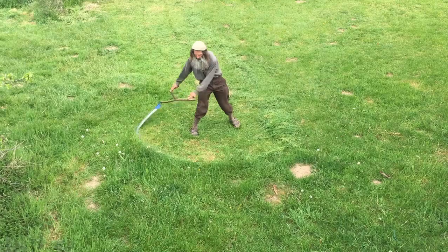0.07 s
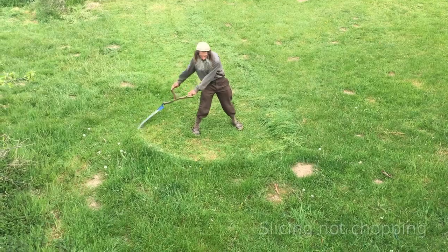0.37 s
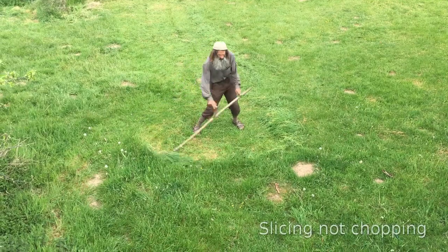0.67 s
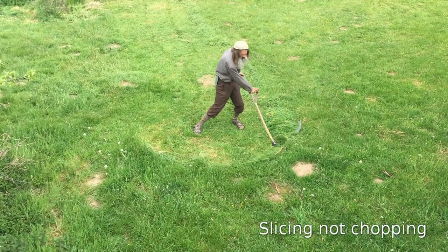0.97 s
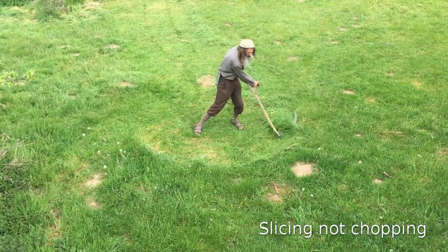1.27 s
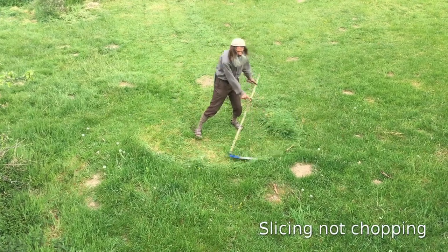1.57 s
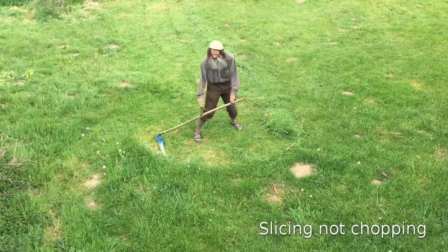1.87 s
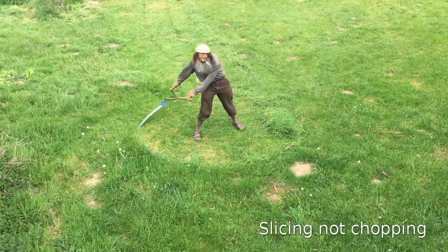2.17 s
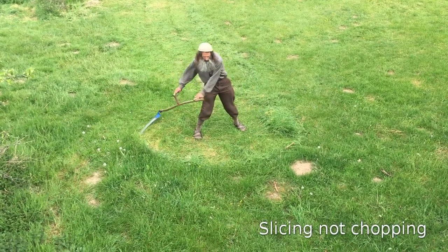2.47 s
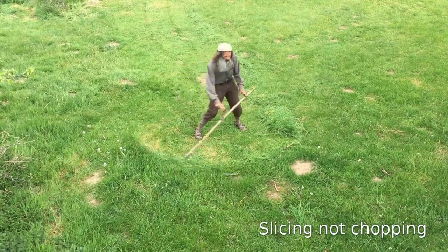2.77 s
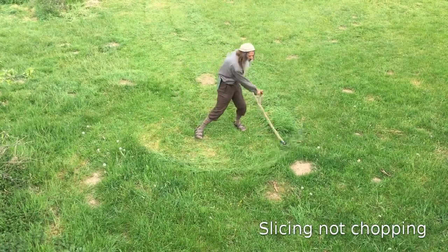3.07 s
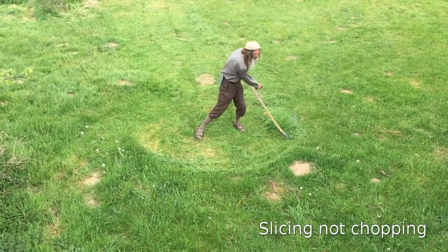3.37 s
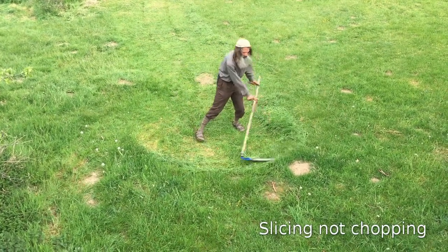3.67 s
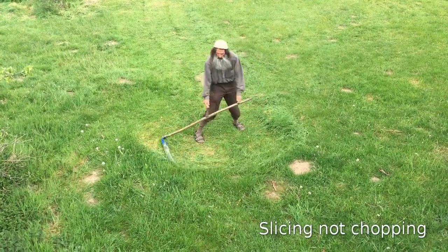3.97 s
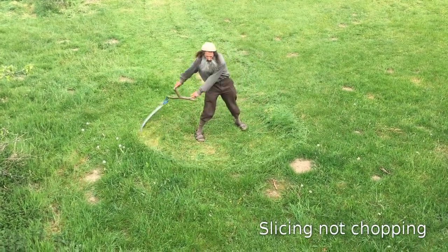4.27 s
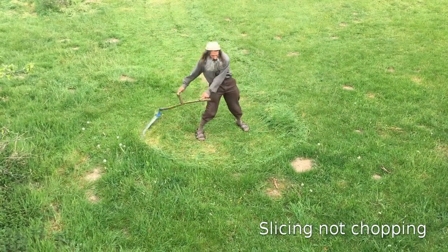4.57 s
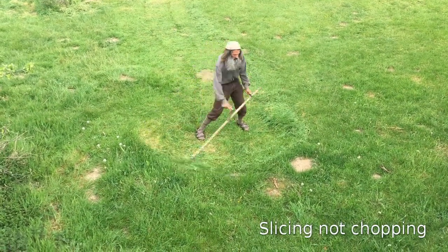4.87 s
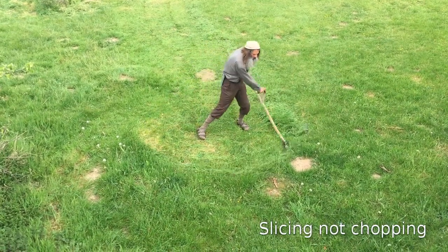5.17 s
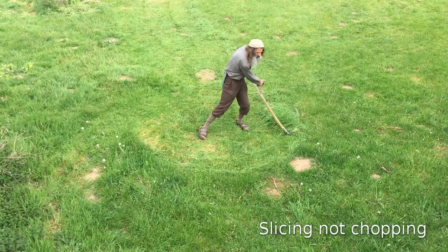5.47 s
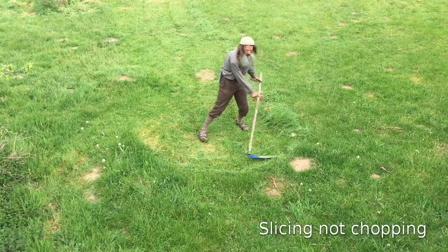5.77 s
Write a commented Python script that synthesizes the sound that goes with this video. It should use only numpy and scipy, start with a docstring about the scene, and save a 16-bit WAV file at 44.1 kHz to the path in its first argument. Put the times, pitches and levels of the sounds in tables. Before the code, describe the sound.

Outdoors on a lawn, gusts flutter and pop against the microphone while a scythe mows in a steady rhythm. Three bright, crunchy swishes cut the grass, each with a small crack of a tough tuft, and the blade scrapes lightly back over the stubble between them. Distant birds add thin whistles after the first stroke and a few rapid chirps during the last. The sound comes only from the left channel.

```python
"""A scythe drags back over the stubble of a lawn while a breeze buffets the microphone.
Three strokes follow, at 0.6, 2.7 and 4.8 s. In each, thousands of snapping stalks hiss and set the
steel ringing; the blade brushes the swath aside, then drags back. Its hiss falls in pitch as it lifts
and rises as it sinks again. From 1.3 s songbirds whistle far off, with a run of chirps at 5.2 s.
Only the left channel carries sound."""
import sys
import numpy as np
from scipy import signal
from scipy.fft import rfft, irfft, next_fast_len
from scipy.io import wavfile
from scipy.ndimage import uniform_filter1d, map_coordinates

SR = 44100
rng = np.random.default_rng(int(sys.argv[2]) if len(sys.argv) > 2 else 0)


def waveform_to_disk(signal):
    """Save audio, clipped to [-1, 1], as 16-bit WAV at the path in sys.argv[1]."""
    frames = np.transpose(np.atleast_2d(signal))
    scaled = np.clip(frames, -1, 1) * 32767
    samples = np.round(scaled).astype(np.int16)
    wavfile.write(sys.argv[1], SR, samples)


N = 260631
T = np.arange(N) / SR


def undb(db):
    """Amplitude ratio of a level in decibels."""
    return 10 ** (np.asarray(db) / 20)


def unit(x):
    """Normalisation to rms 1."""
    return x / np.sqrt(np.mean(x ** 2))


def bell(t, spread):
    """Bell-shaped envelope with its peak of 1 at t = 0."""
    return np.exp(-.5 * (t / spread) ** 2)


def curves(table):
    """Linear interpolation of a table's columns over the times in its first."""
    times, *columns = np.transpose(table)
    return [np.interp(T, times, column) for column in columns]


def colour(x, spectrum, modes=()):
    """Source-filter model: shape x by a (frequency [Hz], level [dB]) spectrum and resonances; rms 1."""
    size = next_fast_len(N)
    f = np.arange(size // 2 + 1) * SR / size
    hz, db = np.transpose(spectrum)
    gain = undb(np.interp(np.log(f + 1), np.log(hz), db, left=-90, right=-90))
    ring = 1 + sum(undb(peak_db) / (1 + 2j * (f - centre) / width) for centre, width, peak_db in modes)
    return unit(irfft(rfft(x, size) * gain * ring, size)[:N])


def wander(rate_hz):
    """Low-pass random modulation: smoothed random steps, rms 1."""
    size = int(SR / rate_hz)
    held = np.repeat(rng.standard_normal(N // size + 1), size)[:N]
    return unit(uniform_filter1d(uniform_filter1d(held, size), size))


def steady(x, seconds):
    """Division by the running rms evens out slow swells and keeps fast ones."""
    size = int(seconds * SR)
    power = uniform_filter1d(uniform_filter1d(x ** 2, size), size)
    return x / np.sqrt(power + 1e-9)


def snaps(per_s, spread_db, rub):
    """Shot noise: stalks snap at random, a few much louder than the rest, over smooth friction noise."""
    clicks = (rng.random(N) < per_s / SR) * rng.standard_normal(N)
    strength = undb(spread_db * np.minimum(rng.exponential(size=N), 4))
    return unit(unit(clicks * strength) + rub * rng.standard_normal(N))


def drag(t, length, late, lift_db_per_s, drag_db=-66.7, swell_db_per_s=9, contact_db_per_s=110):
    """Friction envelope of the return: the blade settles on the stubble, gathers speed and lifts clear."""
    settle_s, lift_at_s, airborne_at_s = .1, 1.45, 1.74
    settling = np.minimum(t - length - settle_s, 0)
    leaving = np.minimum(airborne_at_s + late - t, 0)
    since_lift = t - late - lift_at_s
    motion_db = np.minimum(swell_db_per_s * since_lift, -lift_db_per_s * since_lift)
    return undb(drag_db + contact_db_per_s * (settling + leaving) + motion_db)


def cut(t, length, cut_db=-55.5, rest_drop_db=25, land_s=.145, hold_s=.16):
    """Attack, hold and release, t seconds after entry: the blade lands, keeps its speed, then slows."""
    landing = np.maximum(-t, 0) / land_s
    slowing = np.maximum(t - hold_s, 0) / (length - hold_s)
    return undb(cut_db - rest_drop_db * (landing ** 1.3 + slowing ** 2.5))


# Spectra of the stalks: high swish, low bite, stubble rasp (frequency [Hz], level [dB])
SWISH_SPECTRUM = [(3820, -42), (6500, -8), (9170, 2), (10700, -2.5), (12500, 2), (14700, -1.5), (15600, -2)]
BITE_SPECTRUM = [(400, -19), (750, -4.5), (1050, 0), (1450, 1.5), (1750, 3.5), (2050, -0.5), (2280, -0.5),
                 (2520, -14), (4400, -9), (5400, -15), (6300, -13), (7000, -38), (9000, -43)]
RASP_SPECTRUM = [(2000, -29), (2600, -5), (2950, -5), (3250, 1), (3900, 0), (4400, -2), (4950, -8),
                 (5700, -3), (6400, -11), (7200, -12), (9000, -31)]
# Modes of the steel blade (frequency [Hz], bandwidth [Hz], level relative to the plain noise [dB])
BLADE_MODES = [(1051, 16, 0), (1411, 22, 0), (1603, 30, -4), (2259, 25, -1), (3310, 60, -7), (3744, 40, -7),
               (4683, 40, -6), (5356, 30, -4), (5729, 90, -5), (6293, 30, -3), (6621, 35, -2),
               (9784, 50, -6)]
# Strokes; of the first, only the end of the return is heard
# (entry time [s], cut length [s], lateness of return [s], level [dB], rasp [dB], swath level [dB])
STROKES = [(-1.47, .7, .02, -1, 1, -75), (.6, .72, 0, .3, -1.5, -80), (2.685, .705, .03, -.7, -.5, -63.5),
           (4.78, .745, 0, -.4, .8, -72)]


def scythe(swish_db=.1, bite_db=-7, rasp_db=-5.7, drag_bite_db=-3.5, drag_rasp_db=-5):
    """Forced vibration: snapping stalks hiss and drive the blade's modes; patchy grass varies the level."""
    swish = crunch = rasp = 0
    for entry, length, late, db, stubble_db, swath_db in STROKES:
        t = T - entry
        forward = undb(db) * cut(t, length)
        swath = undb(swath_db) * bell(t - .625, spread=.033)  # slides off near the end of the cut
        bite = undb(bite_db + 5 * bell(t - .16, spread=.11))  # hardest early in the cut
        swish += undb(swish_db) * (forward + swath + drag(t, length, late, lift_db_per_s=48))
        crunch += bite * forward + undb(drag_bite_db) * drag(t, length, late, lift_db_per_s=28)
        scrape = undb(drag_rasp_db) * drag(t, length, late, lift_db_per_s=22)
        rasp += undb(stubble_db) * (undb(rasp_db) * forward + scrape)
    stalks = snaps(per_s=8000, spread_db=1.6, rub=1.0)
    stalks *= undb(.9 * wander(70) + .7 * wander(18))  # small patches and larger clumps
    return (swish * colour(stalks, SWISH_SPECTRUM, BLADE_MODES)
            + crunch * colour(stalks, BITE_SPECTRUM, BLADE_MODES)
            + rasp * colour(stalks, RASP_SPECTRUM, BLADE_MODES))


# Resonances of the gap between blade and turf, alike in every stroke
# (time after entry [s], spread [s], centre frequency [Hz], glide [octaves/s], level [dB])
GAP_RESONANCES = [(-.08, .025, 5900, 5, -70), (.015, .025, 9600, 7.5, -58), (.085, .033, 5700, -1.9, -59.5),
                  (.09, .06, 1850, -2.6, -61), (.28, .08, 1300, -1.6, -67), (.28, .06, 3850, .5, -61.5),
                  (1.44, .09, 1830, 0, -69.3), (1.43, .045, 4750, 0, -68), (1.53, .065, 7400, -4.4, -72.3)]


def turf_gap(relative_width=.16, band_hz=2000):
    """Cavity resonance: hollow bands of hiss fall as the blade lifts off the turf and rise as it nears."""
    edges = band_hz * np.exp(np.array([-.5, .5]) * relative_width)
    bandpass = signal.butter(2, edges, "band", fs=SR, output="sos")
    band = unit(signal.sosfilt(bandpass, rng.standard_normal(N)))
    out = np.zeros(N)
    for entry, length, late, *_ in STROKES:
        offsets = rng.random(len(GAP_RESONANCES)) * N / 2
        for (delay, spread, hz, glide, db), offset in zip(GAP_RESONANCES, offsets):
            centre = entry + delay + (late if delay > length else 0)
            near = np.abs(T - centre) < 3 * spread
            t = T[near] - centre
            # reading the noise band faster or slower moves it to the gliding pitch
            position = offset + np.cumsum(hz * 2 ** (glide * t)) / band_hz
            hiss = map_coordinates(band, [position], order=1, mode="mirror")
            out[near] += undb(db) * bell(t, spread) * hiss
    return out


# Spectra of the wind's slow rolls and quick swirls (frequency [Hz], level [dB])
RUMBLE_SPECTRUM = [(20, -33), (32, -17.5), (45, -8), (65, 2.5), (85, -2.5), (125, -6), (170, -12),
                   (250, -31), (400, -65)]
FLUTTER_SPECTRUM = [(90, -33), (140, -1.5), (190, 4), (280, -8), (400, -10), (520, -22), (700, -36.5),
                    (1000, -44), (1600, -84)]
# Strength of the breeze (time [s], rumble level [dB], flutter level [dB])
GUSTS = [(.06, -46, -53), (.2, -50, -66), (.3, -45, -59), (.7, -40, -51), (1.2, -42.5, -52),
         (1.48, -37, -43), (1.7, -40, -47), (1.85, -48, -61), (2.1, -54, -71), (2.22, -41, -53),
         (2.56, -36.5, -44), (2.74, -41, -57), (2.92, -39, -49), (3.06, -38, -53), (3.24, -43, -55),
         (3.46, -38.5, -43), (3.75, -37, -48), (4.08, -33, -46), (4.24, -44, -53), (4.36, -35, -47),
         (4.54, -34, -41), (4.74, -41, -47), (4.84, -60, -70), (4.96, -40, -60), (5.1, -53, -70),
         (5.36, -42, -62), (5.57, -64, -72), (5.72, -44, -61), (5.91, -47, -63)]


def breeze(rumble_trim_db=1, flutter_trim_db=.5, flicker_db=3.5, puff_db=4.5, usual_flutter_db=-51.5):
    """Turbulence at the microphone: slow rolls, and a fitful flutter that rises in pitch with the gust."""
    rumble_db, flutter_db = curves(GUSTS)
    fits_db, puffs_db = flicker_db * wander(90), puff_db * wander(28)
    rolls = colour(rng.standard_normal(N), RUMBLE_SPECTRUM)
    rolls = steady(rolls * undb(fits_db / 2), seconds=.085)
    # advection: faster air carries the same swirls past sooner
    speed = undb(.15 * np.clip(flutter_db + fits_db - usual_flutter_db, -22, 5))
    swirls = colour(rng.standard_normal(N), FLUTTER_SPECTRUM)
    swirls = map_coordinates(swirls, [np.cumsum(speed)], order=3, mode="mirror")
    swirls = steady(swirls * undb(fits_db), seconds=.094)
    wind = undb(rumble_db + rumble_trim_db) * rolls + undb(flutter_db + flutter_trim_db) * swirls
    return steady(undb(puffs_db), seconds=.12) * wind


# Spectrum of the distant outdoor hush (frequency [Hz], level [dB])
HUSH_SPECTRUM = [(40, 21), (200, 2.5), (600, -0.5), (1200, -4), (2200, -7), (4000, -15), (8000, -17),
                 (15000, -23)]


def hush(hush_db=-66.7, rustle_per_db=.45, usual_rumble_db=-41):
    """Ambient noise: the broadband hush of the lawn swells with the stronger gusts."""
    rumble_db, _ = curves(GUSTS)
    rustle_db = rustle_per_db * np.maximum(rumble_db - usual_rumble_db, 0)
    return undb(hush_db + rustle_db + wander(5.7)) * colour(rng.standard_normal(N), HUSH_SPECTRUM)


# The strongest eddies that thump the microphone (time [s], level [dB], frequency [Hz], crest level [dB])
EDDIES = [(.298, -36, 150, -70), (.379, -35, 167, -66), (.608, -32, 250, -42), (.676, -32.5, 200, -59),
          (.887, -34, 258, -41.5), (1.172, -33, 245, -50), (1.25, -40, 275, -40), (1.308, -30.5, 160, -67),
          (1.37, -24.5, 293, -37.5), (1.484, -38, 173, -45), (1.501, -28, 190, -43),
          (2.194, -36.5, 221, -50), (2.22, -34, 168, -57), (2.357, -31, 224, -44.5),
          (2.483, -34.5, 220, -46), (2.498, -30, 227, -65), (2.554, -23, 234, -34.5),
          (2.804, -30, 158, -68), (2.86, -29, 243, -55), (2.868, -27, 181, -63), (3.017, -27.5, 175, -58),
          (3.06, -25.5, 182, -70), (3.278, -32, 154, -70), (3.392, -30.5, 185, -70), (3.408, -39, 276, -50),
          (3.434, -25, 360, -24), (3.44, -33, 260, -33), (3.516, -40, 298, -42), (3.579, -34.5, 240, -37),
          (3.675, -28, 202, -61), (3.692, -26, 330, -29), (3.841, -28.5, 160, -60), (3.866, -38, 260, -44),
          (3.946, -29, 258, -37.5), (4.087, -29, 167, -47), (4.369, -34, 187, -46), (4.458, -36, 288, -36),
          (4.478, -27.5, 129, -64), (4.51, -31, 230, -41), (4.52, -23, 169, -52), (4.733, -35.5, 218, -43),
          (5.337, -37, 247, -65)]


def eddies(swing_trim_db=1.5, crest_trim_db=1, spread_cycles=.61, crest_hz=500, crest_s=.00078):
    """Pressure transients: each eddy gives a few uneven swings, and a steep central crest makes it pop."""
    out = np.zeros(N)
    wobble = np.exp(.15 * wander(300))
    phases = rng.random((len(EDDIES), 2))
    for (time, db, hz, crest_db), (swing_phase, crest_phase) in zip(EDDIES, phases):
        near = np.abs(T - time) < .04
        t = T[near] - time
        cycles = np.cumsum(hz * wobble[near]) / SR
        swing = bell(t, spread_cycles / hz) * np.sin(2 * np.pi * (swing_phase + cycles - cycles.mean()))
        crest = np.sin(2 * np.pi * (crest_phase + crest_hz * t)) / np.cosh(t / crest_s)
        out[near] += undb(db + swing_trim_db) * swing + undb(crest_db + crest_trim_db) * crest
    return out


# Spectra of a tuft's crack and of the ringing edge (frequency [Hz], level [dB])
CRACK_SPECTRUM = [(900, 3.5), (2600, -1), (3400, 3.5), (6500, 0), (7800, -1), (9800, 6.5),
                  (11500, -15), (14500, 9), (16000, 0)]
EDGE_SPECTRUM = [(5200, -27), (5680, 4), (6050, -9), (6300, -2), (6650, -6), (7000, -23)]
# Tough tufts met by the edge (time [s], level [dB], spread [s], relative crunch [dB], relative ring [dB])
TUFTS = [(0.747, -60.5, .003, 15, -15), (0.756, -42.5, 0.0029, -15, -23), (0.776, -58, 0.0094, 3.5, -6),
         (2.85, -41.5, 0.0041, -21, 0.5), (2.862, -55, 0.0046, 0, -4), (5.291, -47.5, 0.0014, -12, -12)]


def tufts():
    """Impulsive excitation: a tough tuft gives way all at once and makes the thin edge ring."""
    stalks = snaps(per_s=7000, spread_db=2, rub=.8)
    crack = colour(stalks, CRACK_SPECTRUM, BLADE_MODES)
    crunch = colour(stalks, BITE_SPECTRUM, BLADE_MODES)
    ring = colour(rng.standard_normal(N), EDGE_SPECTRUM, BLADE_MODES)
    out = np.zeros(N)
    for time, db, spread, crunch_db, ring_db in TUFTS:
        out += undb(db) * bell(T - time, spread) * (crack + undb(crunch_db) * crunch + undb(ring_db) * ring)
    return out


# Falling pitch of each chirp in the run (start [Hz], middle [Hz], end [Hz])
CHIRP_PITCHES = (3360, 3020, 2500)
# Whistled notes (time [s], length [s], start pitch [Hz], middle pitch [Hz], end pitch [Hz], level [dB])
BIRD_NOTES = [(1.32, .18, 2580, 2160, 2170, -70), (1.608, .02, 1900, 2300, 2700, -66),
              (1.633, .016, 1980, 2330, 2500, -65.5), (1.648, .062, 2214, 2330, 2220, -65.5),
              (1.723, .089, 2160, 2063, 1940, -68), (1.788, .054, 4030, 3810, 3900, -69),
              (2.159, .11, 1795, 1640, 1500, -71), (2.316, .067, 2530, 2526, 2400, -61),
              (2.37, .04, 5800, 4730, 3850, -75), (2.401, .074, 3780, 3830, 4070, -76.5),
              (2.464, .12, 2960, 2865, 3050, -69), (2.472, .04, 5660, 5000, 4400, -75),
              (3.41, .13, 2130, 1950, 1770, -72.5), (3.62, .046, 2120, 2120, 2060, -68),
              (4.52, .065, 2280, 2460, 2440, -71), (5.239, .135, 2330, 2173, 2050, -68),
              (5.492, .041, 3120, 3030, 2800, -68), (5.542, .04, 2320, 2500, 2800, -69),
              (5.644, .056, 2220, 2150, 2140, -68), (5.649, .12, 3550, 2690, 2105, -65.5),
              (5.693, .24, 7250, 7130, 7250, -72)]


def birds(run_at_s=5.2, step_s=.06, chirp_s=.018, chirp_db=-61, trim_db=-.3, echo_db=-6, echo_t60_s=.61):
    """Frequency modulation: gliding whistles and chirps, blurred by moving air and echoes from trees."""
    song = np.zeros(N)
    drift, shimmer = 1 + .011 * wander(250), undb(1.8 * wander(60))
    chirps = [(run_at_s + k * step_s, chirp_s, *CHIRP_PITCHES, chirp_db) for k in range(5)]
    for start, length, *pitches, db in BIRD_NOTES + chirps:
        near = (T > start) & (T < start + length)
        progress = (T[near] - start) / length
        hz = np.polyval(np.polyfit([0, .5, 1], pitches, 2), progress) * drift[near]
        envelope = undb(db + trim_db) * np.sqrt(np.sin(np.pi * progress)) * shimmer[near]
        song[near] += envelope * np.sin(2 * np.pi * np.cumsum(hz) / SR)
    t = T[:SR // 2]
    trees = rng.standard_normal(len(t)) * undb(-60 * t / echo_t60_s)
    echo = signal.fftconvolve(song, trees / np.linalg.norm(trees))[:N]
    return song + undb(echo_db) * echo


def scene():
    """Superposition: all sources add at one microphone on the left channel; the right is silent."""
    background = hush()
    left = scythe() + turf_gap() + breeze() + background + eddies() + tufts() + birds()
    return np.array([left, np.zeros(N)])


def record(dry, gain_db=6, top_hz=15750):
    """Band limiting: the sound opens after a short silence, is amplified and passes a steep low-pass."""
    opening = np.clip((T - .056) / .008, 0, 1)
    lowpass = signal.ellip(10, .1, 90, top_hz, fs=SR, output="sos")
    return signal.sosfilt(lowpass, undb(gain_db) * opening * dry)


dry = scene()
out = record(dry)
waveform_to_disk(out)
```